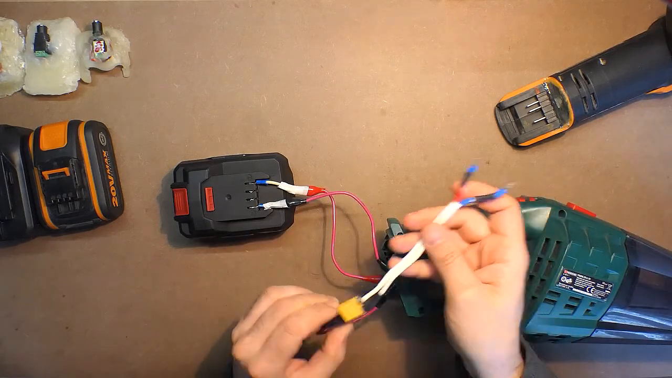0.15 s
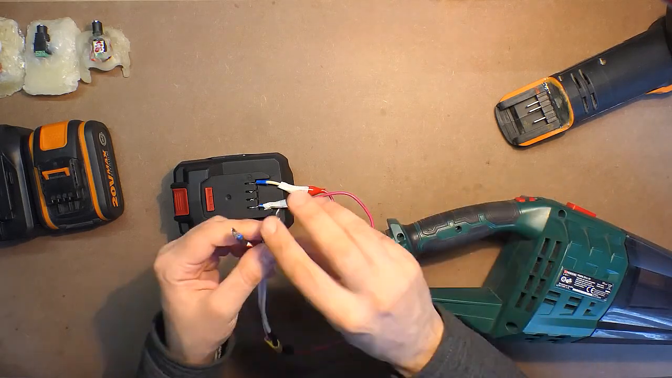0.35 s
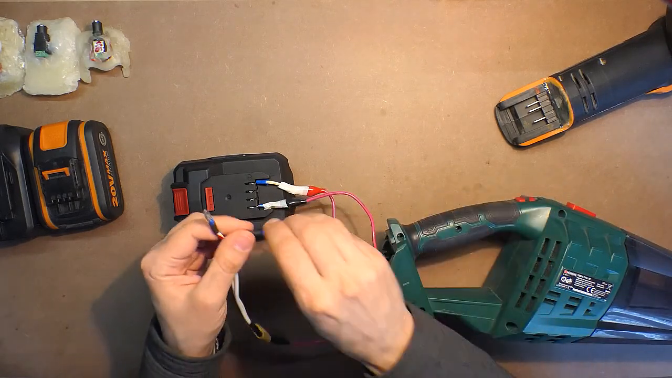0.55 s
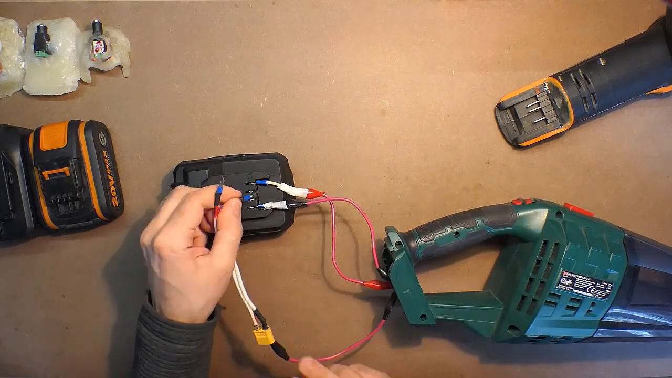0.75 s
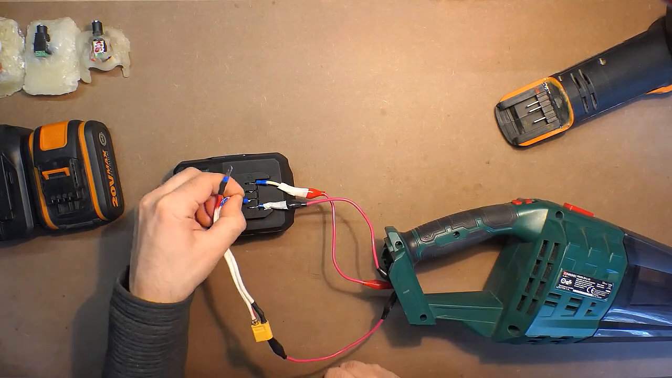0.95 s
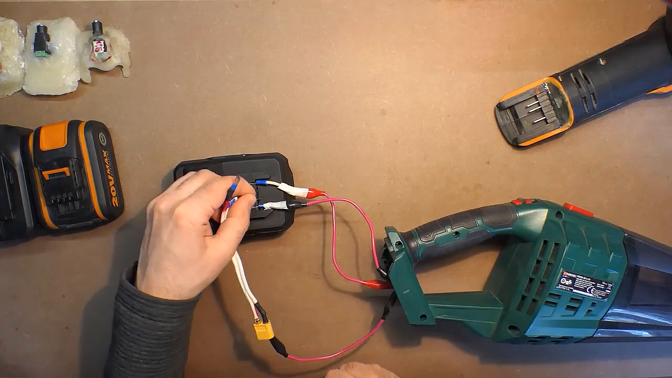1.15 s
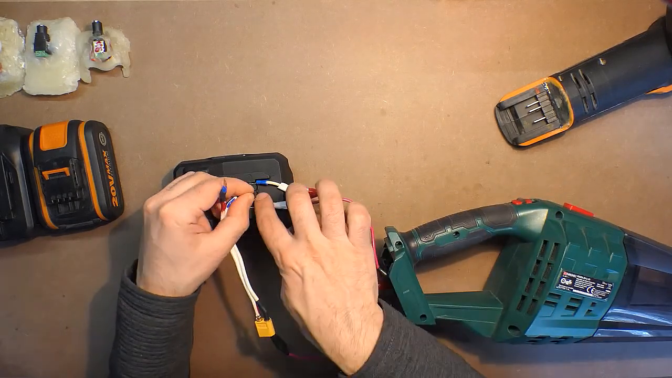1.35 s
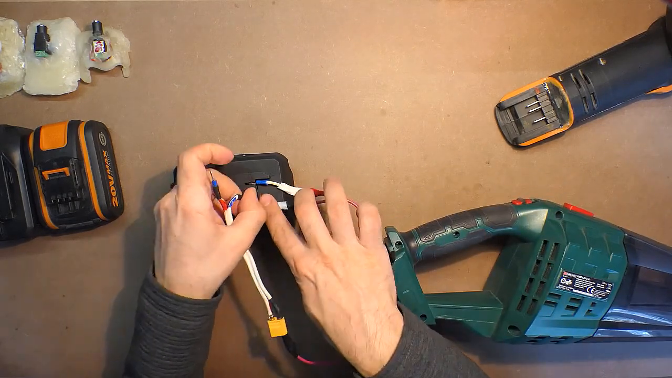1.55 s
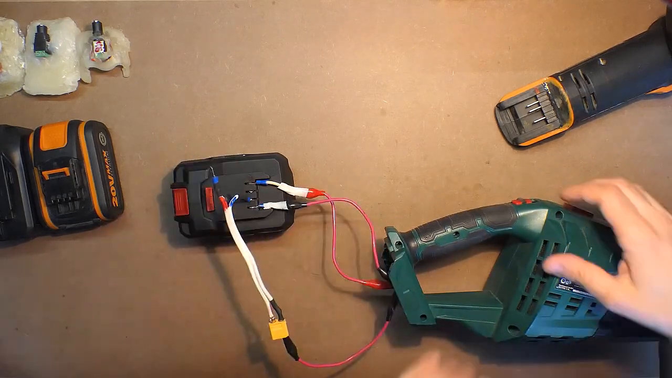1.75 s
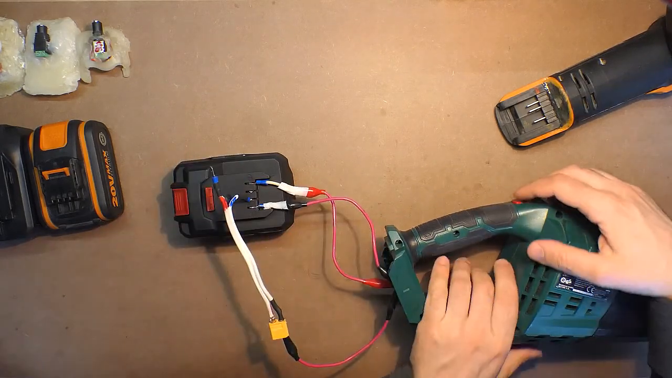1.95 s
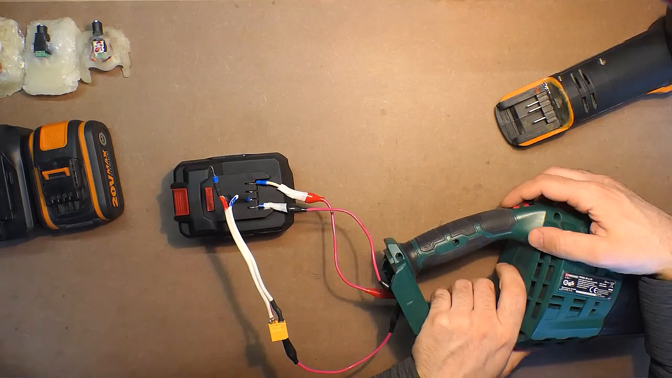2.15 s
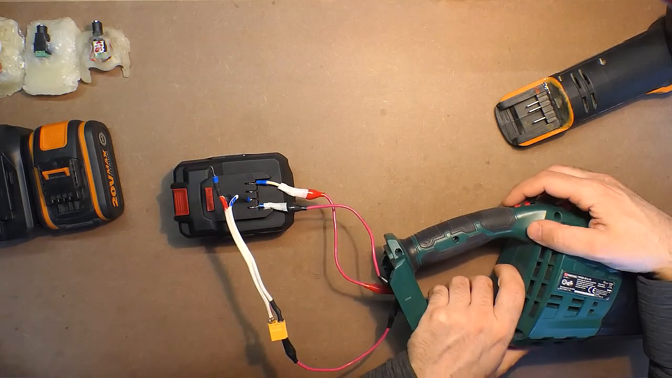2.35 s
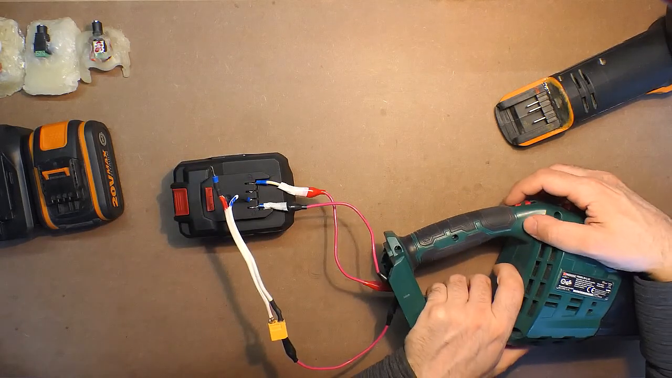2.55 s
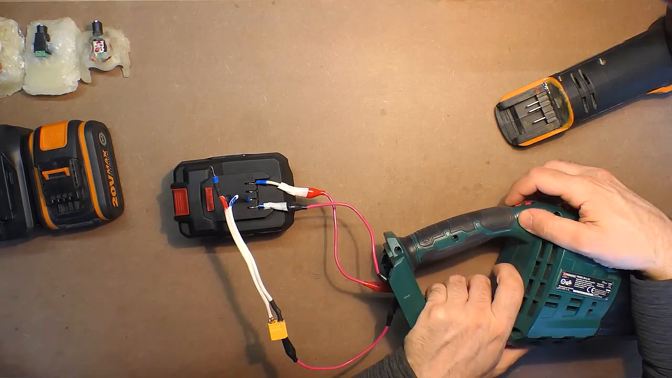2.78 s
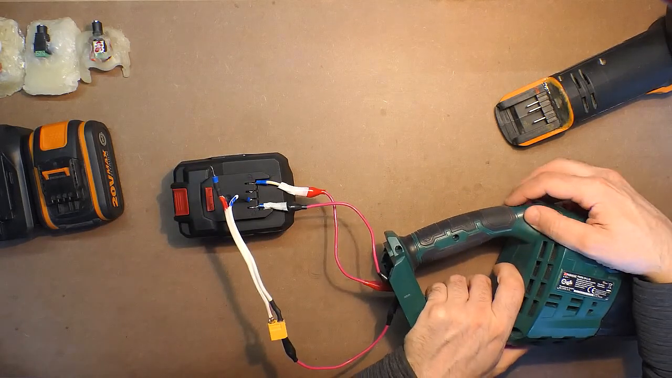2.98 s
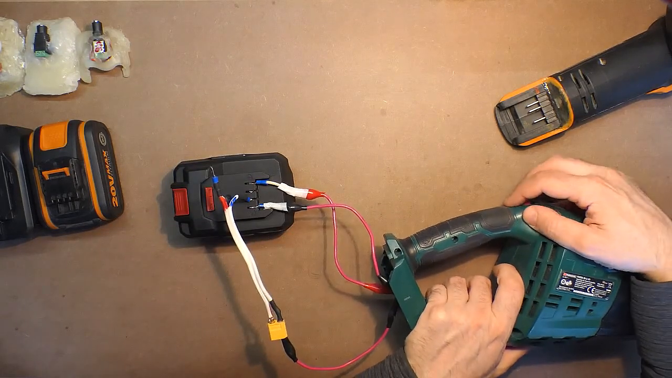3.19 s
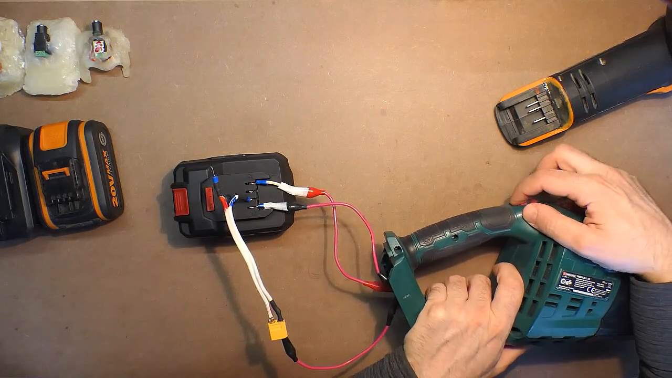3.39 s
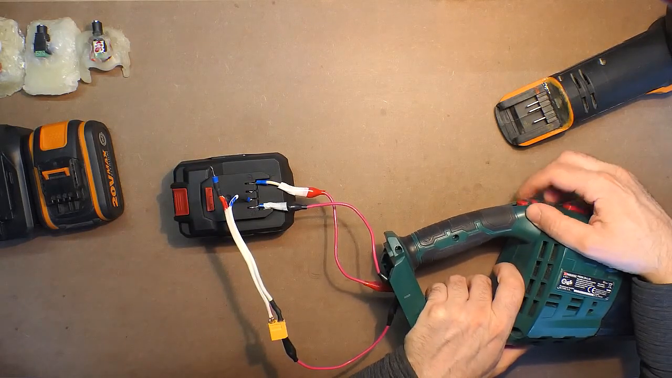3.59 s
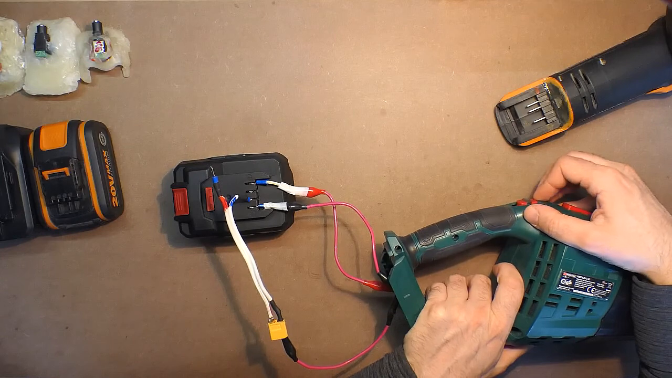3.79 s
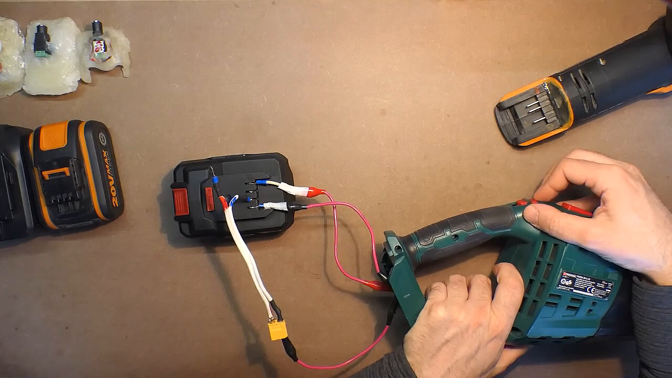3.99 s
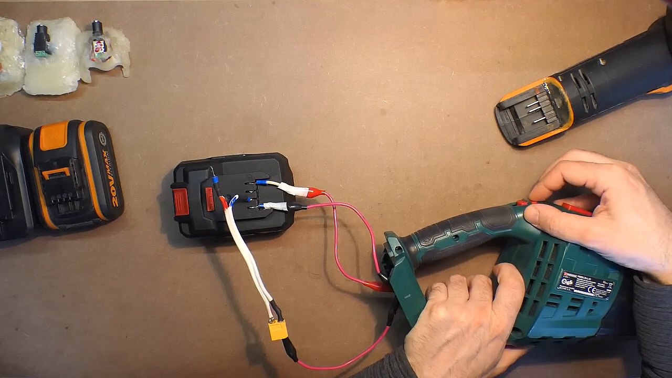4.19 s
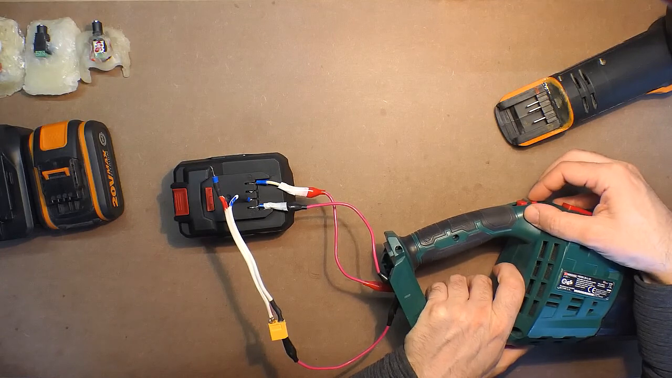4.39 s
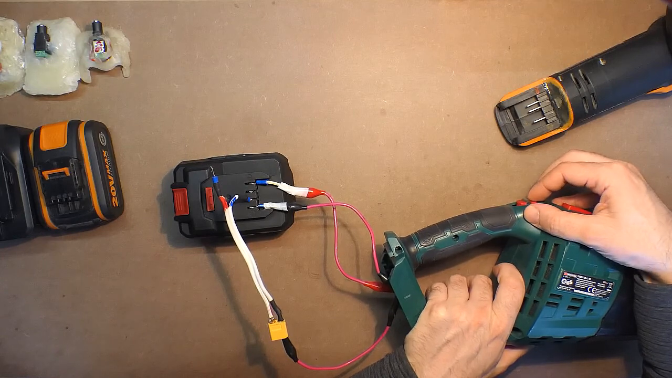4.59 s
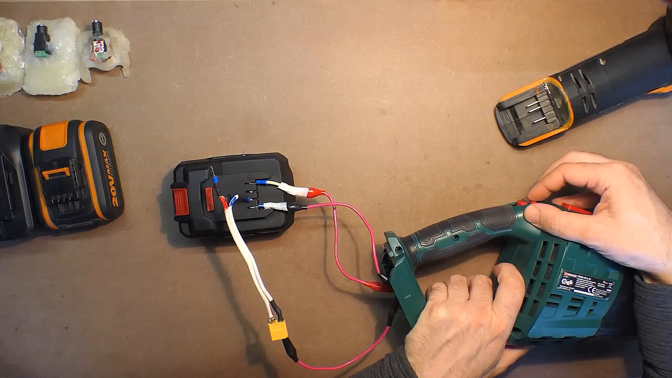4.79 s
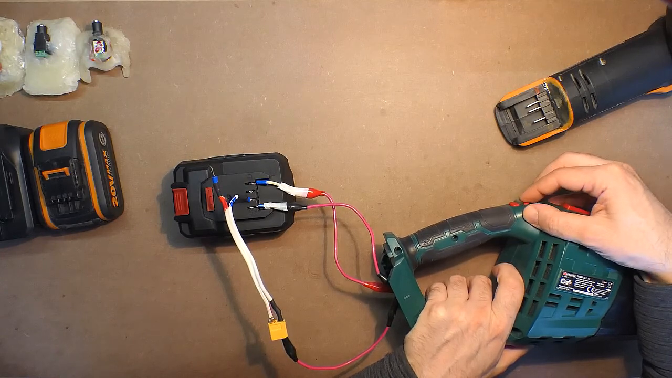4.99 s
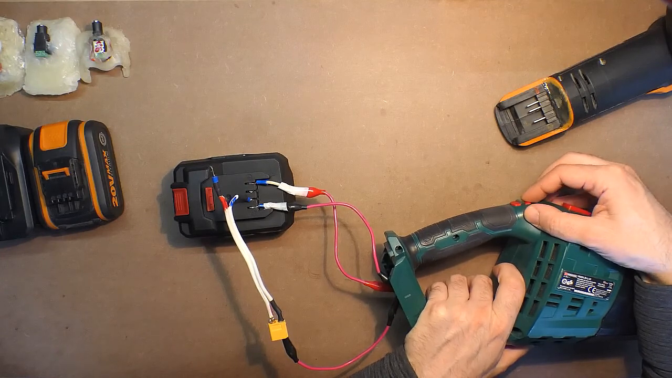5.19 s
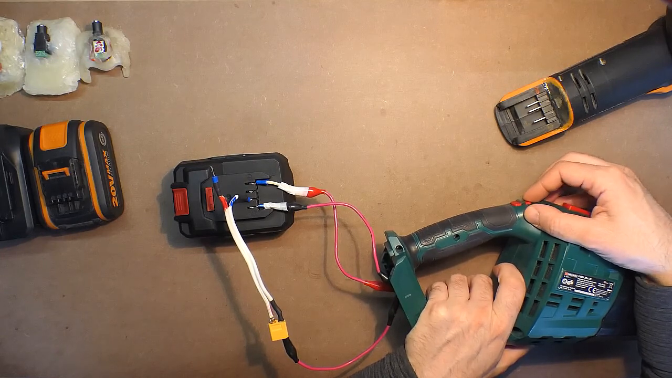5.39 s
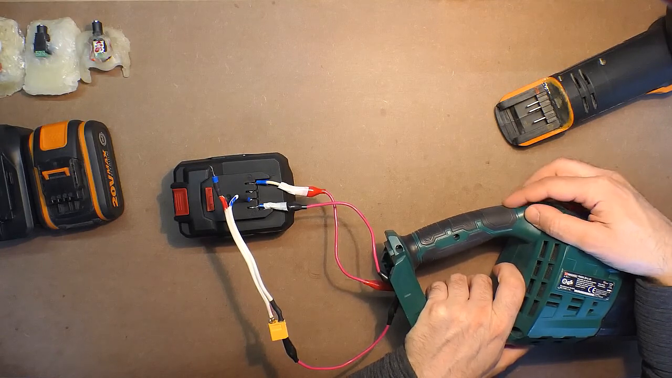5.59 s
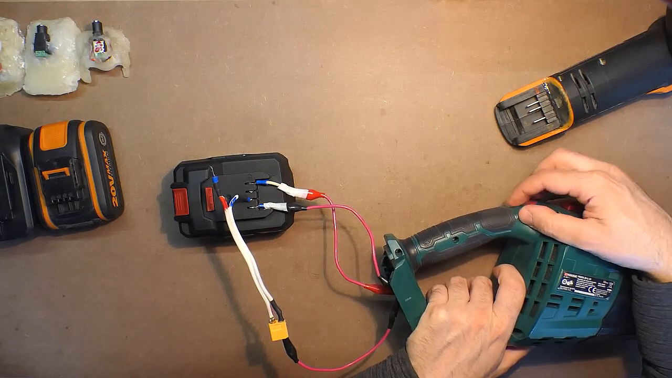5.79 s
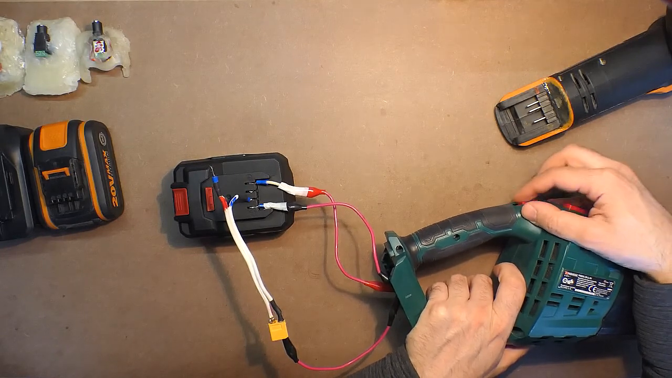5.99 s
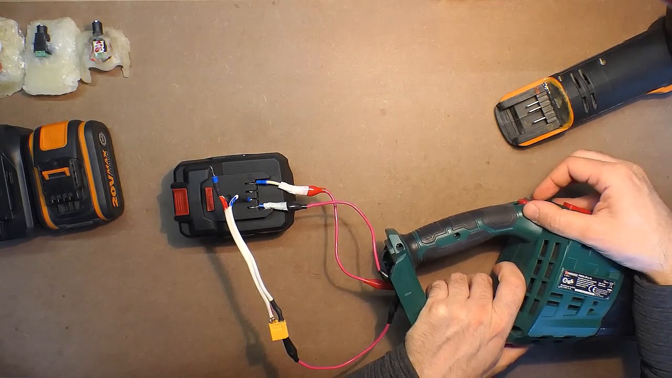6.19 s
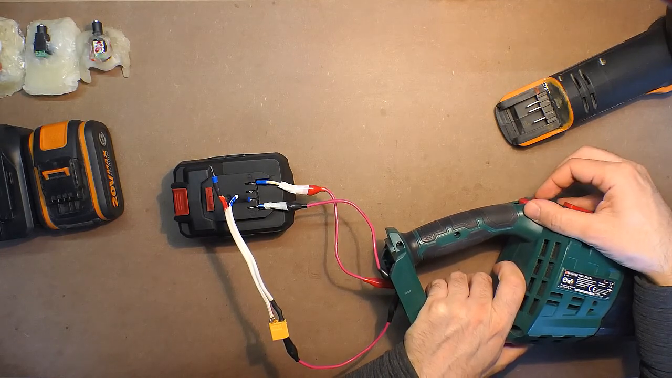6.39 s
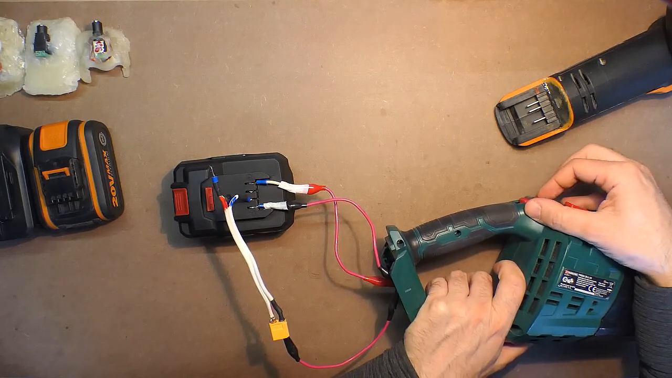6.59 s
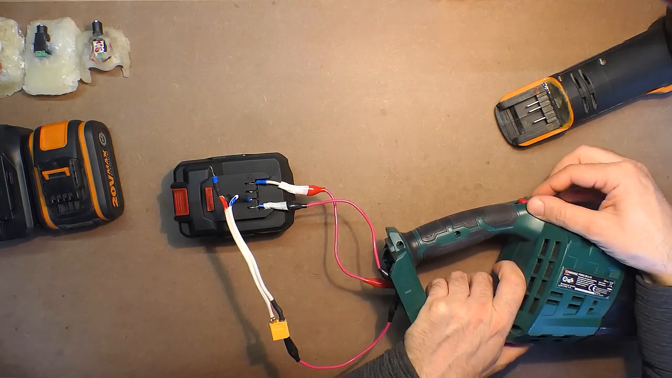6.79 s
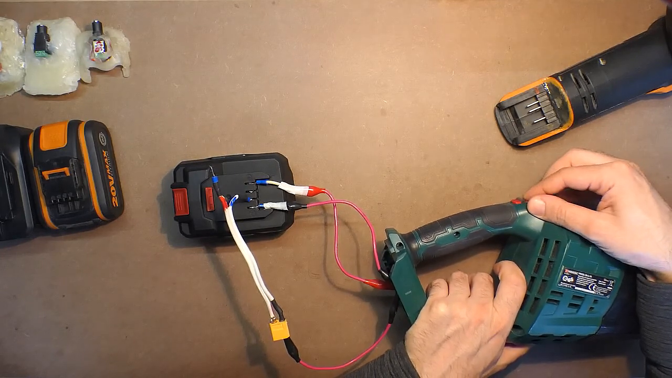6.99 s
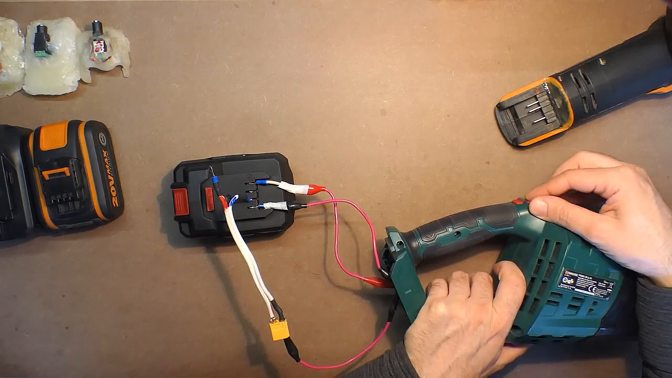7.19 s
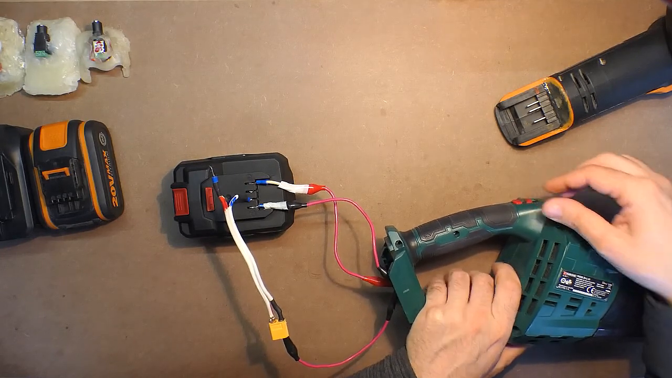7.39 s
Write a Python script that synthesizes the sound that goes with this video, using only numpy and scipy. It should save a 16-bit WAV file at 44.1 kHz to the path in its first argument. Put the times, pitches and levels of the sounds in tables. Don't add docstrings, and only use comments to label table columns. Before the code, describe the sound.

After quiet ticks, rustles and soft bench thumps, a small vacuum motor snaps on, whines with rushing air, winds down, then runs once more.

```python
import sys
import numpy as np
from scipy import signal
from scipy.fft import rfft, irfft, next_fast_len
from scipy.io import wavfile
from scipy.ndimage import uniform_filter1d

SR = 44100
rng = np.random.default_rng(int(sys.argv[2]) if len(sys.argv) > 2 else 0)


def log_audio(samples):
    frames = np.atleast_2d(samples).T
    limited = np.clip(frames, -1, 1)
    pcm = np.round(limited * 32767).astype(np.int16)
    wavfile.write(sys.argv[1], SR, pcm)


def convert_level_to_amplitude(level_db):
    exponent = np.asarray(level_db, float) / 20
    return 10 ** exponent


N = 328545


def rms_one(x):
    return x / np.sqrt(np.mean(x ** 2) + 1e-20)


def lift_db(modes, hz):
    return sum(db / (1 + (2 * (hz - centre_hz) / width_hz) ** 2) for centre_hz, width_hz, db in modes)


def coloured(spectrum, modes=()):
    size = next_fast_len(N)
    hz = np.arange(size // 2 + 1) * SR / size + 1e-3
    corner_hz, corner_db = np.transpose(spectrum)
    db = np.interp(np.log(hz), np.log(corner_hz), corner_db, left=-90, right=-90)
    white = rfft(rng.standard_normal(size))
    return rms_one(irfft(white * convert_level_to_amplitude(db + lift_db(modes, hz)), size)[:N])


def drift(rate_hz):
    r = np.exp(-80 * np.pi * rate_hz / SR)
    slow = signal.lfilter([1], [1, -2 * r, r * r], rng.standard_normal(N // 40 + 2002))[2000:]
    return np.interp(np.arange(N) / 40, np.arange(len(slow)), rms_one(slow))


def dying(start_s, t60_s, rise_s):
    i = int(start_s * SR)
    t = np.arange(min(int(t60_s * SR), N - i)) / SR
    return slice(i, i + len(t)), t, convert_level_to_amplitude(-60 * t / t60_s) * (1 - np.exp(-t / rise_s))


def band_passed(x, low_hz, high_hz):
    return signal.sosfilt(signal.butter(2, [low_hz, high_hz], "band", fs=SR, output="sos"), x)


# f/Hz, density/dB
HUSH_SPECTRUM = [(12, -28), (20, 8), (50, 0.5), (110, -0.5), (227, -17), (300, -17), (655, -46), (969, -27),
                 (1150, -34), (10100, -49), (15800, -53)]


def background_hush():
    return convert_level_to_amplitude(-63) * coloured(HUSH_SPECTRUM)


# t/s, rustle level/dB
HAND_ACTIVITY = [
    (0.0, -82),
    (1.79, -77.5),
    (1.84, -70.5),
    (1.95, -66.5),
    (2.2, -61),
    (2.25, -69.5),
    (2.45, -68),
    (2.74, -69.5),
    (2.79, -69),
    (3.27, -74.5),
]
# f/Hz, density/dB
RUSTLE_SPECTRUM = [(590, -21), (1000, -4), (1290, -7), (1530, -10), (2090, -4.5), (5000, -10.5),
                   (9500, -8.5), (15800, -12)]
# f/Hz, density/dB
KNOCKING_SPECTRUM = [(71, -39), (120, -7), (261, -11.5), (529, -14), (702, -21.5), (1560, -26), (2000, -38),
                     (2600, -72), (4400, -120)]
# f/Hz, density/dB
RUMBLE_SPECTRUM = [(11, -67), (18, -8.5), (49, -1), (66, -3), (91, -6), (150, -18), (200, -48), (330, -120)]


def hands():
    t = np.arange(N) / SR
    activity_s, activity_db = np.transpose(HAND_ACTIVITY)
    rustle_db = np.interp(t, activity_s, activity_db)
    swing_db = rustle_db - rustle_db.max()
    before = t < activity_s[-1]
    rustle = convert_level_to_amplitude(rustle_db + 1.4 * drift(21)) * coloured(RUSTLE_SPECTRUM)
    knocking = convert_level_to_amplitude(-60 + 0.9 * swing_db + 2.6 * drift(14)) * coloured(KNOCKING_SPECTRUM)
    motor_rumble_db = -53.5
    rumble_db = np.where(before, -48.5 + 0.77 * swing_db, motor_rumble_db)
    rumble = convert_level_to_amplitude(rumble_db + 2.6 * drift(2.5)) * coloured(RUMBLE_SPECTRUM)
    return before * (rustle + knocking) + rumble


# t/s, peak level/dB, body f/Hz, bright level/dB
LEAD_TICKS = [(0.0994, -61, 3300, 9), (0.3594, -72, 1170, 16), (0.838, -54, 1520, -14),
              (0.855, -47, 2530, -3), (0.909, -53, 1515, -5), (0.954, -35.5, 2380, -8.5),
              (0.9554, -42, 4270, -15), (0.9616, -44, 1770, -12), (1.1344, -62, 3420, -10),
              (1.149, -39.5, 3100, 6.5), (1.182, -33.5, 2760, -1.5), (1.2447, -48, 2770, 4),
              (1.324, -57.5, 2820, 15), (1.4194, -61, 3210, -9), (1.5505, -50, 2920, -3),
              (1.565, -45, 2530, 2), (1.6214, -57.5, 2470, 10)]
# t/s, peak level/dB, body f/Hz, bright level/dB, knock level/dB
GRIP_TICKS = [(0.029, -66, 900, -12, 15), (2.068, -48, 1240, -12, -3), (2.1564, -53.5, 1640, -12, 14),
              (2.2404, -54, 1360, 10, -2), (2.323, -37, 2070, -11, -10), (2.4424, -51, 1140, -12, 23.5),
              (2.591, -42.5, 2420, 3, -0.5), (2.609, -45.5, 1340, 5, -1), (2.8318, -42, 1500, 0.5, 1.5),
              (2.9685, -37.5, 2600, -5, -27), (3.0594, -55, 1870, -6, 6.5)]


def ticks():
    lead_knock_db, lead_t60_s, grip_t60_s = -15, 0.034, 0.027
    out, white = np.zeros(N), rng.standard_normal(N)
    grains = rms_one(convert_level_to_amplitude(5.2 * drift(270)))
    bright = band_passed(white, 4500, 11500)
    knock = rms_one(band_passed(rng.standard_normal(N), 130, 600))
    rows = [(*row, lead_knock_db, lead_t60_s) for row in LEAD_TICKS]
    rows += [(*row, grip_t60_s) for row in GRIP_TICKS]
    for start_s, peak_db, body_hz, bright_db, knock_db, t60_s in rows:
        i = round(start_s * SR)
        at, t = slice(i - 900, i + 3000), np.arange(-900, 3000) / SR
        crack = (t >= 0) * convert_level_to_amplitude(-60 * np.abs(t) / (0.7 * t60_s))
        cluster = 0.19 * grains[at] * np.exp(-((t - 0.064 * t60_s) / (0.54 * t60_s)) ** 2)
        body = rms_one(band_passed(white[at], body_hz * 0.68, body_hz * 1.75))
        out[at] += convert_level_to_amplitude(peak_db - 9.5) * (crack + cluster) * (body + convert_level_to_amplitude(bright_db) * bright[at])
        at, t, fall = dying(start_s, 3.1 * t60_s, 0.0064)
        out[at] += convert_level_to_amplitude(peak_db + knock_db - 6) * fall * knock[at]
    return out


# t/s, peak level/dB, f/Hz, t60/s, rise/s
BENCH_THUMPS = [(.03, -43, 68.7, .3, 0.016), (0.94, -46, 78.5, 0.18, 0.011), (1.15, -40.5, 55, 0.4, 0.012),
                (1.171, -50, 144, 0.097, 0.0072), (1.554, -29, 60.5, 0.089, .03),
                (1.562, -41, 170, 0.022, 0.0058), (.95, -53, 218, 0.081, .005),
                (2.12, -39.5, 53, 0.7, 0.051), (2.443, -30, 51.3, 0.43, 0.0097),
                (2.443, -37.5, 140, 0.12, 0.0045), (2.614, -37, 44, 0.56, 0.0099),
                (2.821, -60.5, 57.5, 0.69, .01), (3.05, -48, 59.3, 0.91, 0.013),
                (3.278, -29.5, 116, 0.032, 0.0035), (3.278, -33, 45.6, 0.089, 0.0055),
                (3.40, -32, 62, 0.25, 0.0082), (3.948, -40, 53.7, 0.33, .02), (4.91, -29, 45, 0.35, 0.018),
                (5.79, -41, 50, .3, .03), (5.853, -33, 59, 0.16, 0.0084), (5.91, -30.5, 48.4, 0.26, 0.017),
                (6.979, -28.5, 52, 0.42, 0.018), (7.402, -34.5, 65, .3, .015)]


def thumps():
    out = np.zeros(N)
    for start_s, peak_db, hz, t60_s, rise_s in BENCH_THUMPS:
        at, t, fall = dying(start_s, t60_s, rise_s)
        out[at] += convert_level_to_amplitude(peak_db) * fall / fall.max() * np.sin(2 * np.pi * hz * t)
    return out


# t/s, peak level/dB, t60/s
SWITCH_CONTACTS = [(3.261, -52, 0.048), (3.2779, -16.5, 0.036), (3.2802, -6.5, 0.03), (3.281, 2, 0.025),
                   (3.288, -9, 0.032), (3.293, -43, .1), (3.387, -31, 0.23), (4.899, -9.5, 0.033),
                   (4.906, -21, .05), (5.844, -19, .03), (5.8469, 3, 0.022), (5.849, -3.5, 0.02),
                   (5.853, -12, 0.032), (5.861, -35, .06), (6.973, -9.5, 0.1)]
# f/Hz, density/dB
SWITCH_SPECTRUM = [(120, -14), (200, -11), (968, -14.5), (2380, -4), (3070, -0.5), (3490, -3.5),
                   (5330, -2.5), (7410, -4.5), (8120, 1), (10100, -1.5), (11900, -6), (15100, -13.5),
                   (16000, -26)]


def switch():
    out, crack = np.zeros(N), coloured(SWITCH_SPECTRUM)
    for start_s, peak_db, t60_s in SWITCH_CONTACTS:
        at, t, fall = dying(start_s, t60_s, 0.00004)
        out[at] += convert_level_to_amplitude(peak_db - 5) * fall * crack[at]
    return out


TOP_SPEED_HZ = 396.9
# on t/s, off t/s
POWER = [
    (3.3813, 4.9048),
    (5.849, 6.9763),
]


def shaft():
    spin_up_s, settle_hz, settle_s = 0.0914, 16.5, 0.45
    coast_s, coast_power = 2.12, 2.04
    warm_gain_hz = 1.0
    t, speed, rest, top = np.arange(N) / SR, np.zeros(N), 0, TOP_SPEED_HZ
    ends = [on for on, off in POWER[1:]] + [N / SR]
    for (on, off), end in zip(POWER, ends):
        driven = np.clip(t, on, off) - on
        free = np.clip(t, off, end) - off
        quick = (top - rest - settle_hz) * np.exp(-driven / spin_up_s)
        creep = settle_hz * np.exp(-driven / settle_s)
        coast = (1 + free / coast_s) ** -coast_power
        speed = np.where(t >= on, (top - quick - creep) * coast, speed)
        rest, top = speed[-1], top + warm_gain_hz
    return speed


# multiple, powered level/dB, coasting level/dB, inrush level/dB, roughness 0-1
SHAFT_ORDERS = [(1, -45, -45, -40, .35), (2, -49, -42, -45, .8), (3, -36, -42, -46, .12),
                (14, -41, -52, -55, .5), (10, -42, -33, -11, .25), (4, -48, -43, -50, .6),
                (5, -36, -45, -26, .5), (6, -48, -44, -55, .6), (7, -35, -35, -40, .4),
                (8, -44, -48, -50, .9), (9, -50, -49, -55, .9), (15, -58, -57, -13, .6),
                (35, -50, -66, -70, .55)]
# f/Hz, width/Hz, lift/dB
FRAME_MODES = [(359, 125, 18.5), (403.2, 29, -11), (598, 31, 10.5), (764, 87, 9.5), (1025, 183, -13),
               (1127, 320, 10), (1680, 204, -14), (1916, 71, 6), (2150, 76, 3.5), (2676, 280, 6.5),
               (3000, 83, 5), (3780, 800, -11), (4670, 240, 20), (5307, 360, 9.5)]


def shaft_orders(speed, powered):
    poles, breakaway_hz = 5, 108
    whine_slope_db, cogging_slope_db, load_slope_db = 26, 28.5, 18
    inrush_delay = 0.44
    coasting_roughness = 0.45
    t = np.arange(N) / SR
    decades = np.log10(np.maximum(speed / TOP_SPEED_HZ, 0.05))
    inrush = powered * np.clip(1 - speed / TOP_SPEED_HZ, 0, 1) ** 1.97
    inrush = inrush * np.minimum(speed / breakaway_hz, 1) ** 4
    turn = 2 * np.pi * np.cumsum(speed * (1 + 0.000838 * drift(25))) / SR
    grip_db = -18.5 * np.exp(-((t - 6.86) / 0.09) ** 2)
    tones = 0
    for k, on_db, coast_db, inrush_db, roughness in SHAFT_ORDERS:
        coast_slope_db = whine_slope_db if k % poles else cogging_slope_db
        share = powered * convert_level_to_amplitude(on_db + (whine_slope_db + load_slope_db) * decades)
        share = share + (1 - powered) * convert_level_to_amplitude(coast_db + coast_slope_db * decades)
        share = share + inrush * convert_level_to_amplitude(inrush_db + 20 * inrush_delay * max(k - poles, 0) * decades)
        lift = lift_db(FRAME_MODES, k * speed[::64]).repeat(64)[:N]
        if k == 3:
            lift = lift + grip_db
        rough = roughness * (coasting_roughness + (1 - coasting_roughness) * powered)
        waver = np.sqrt(1 - rough ** 2) + rough * drift(19.5)
        tone = np.sin(k * turn + rng.uniform(0, 2 * np.pi))
        tones = tones + share * convert_level_to_amplitude(lift + 2.2 * drift(2.1)) * waver * tone
    return np.sqrt(2) * tones


# f/Hz, density/dB
ROAR_SPECTRUM = [(590, -79), (1000, -9), (1160, -2.5), (1260, -4.5), (1490, -7.5), (1930, -1), (2510, -5.5),
                 (2850, -4), (4350, -9.5), (5500, -14.5), (7150, -76), (12100, -120)]
# f/Hz, density/dB
HISS_SPECTRUM = [(2650, 0), (4500, -2), (4740, -14), (5050, 0.5), (5730, -3.5), (6430, -7.5), (6570, -3),
                 (6960, -1), (7610, -3.5), (9850, 1), (10700, -6.5), (11500, -3.5), (15800, -14.5)]
# f/Hz, density/dB
SHUDDER_SPECTRUM = [(53, -39), (90, -16), (290, -6), (333, -7), (396, -4), (682, -9.5), (1000, -11),
                    (1300, -27), (2200, -120)]
# f/Hz, width/Hz, lift/dB
HOUSING_MODES = [(328, 10.5, -4.5), (478, 15, 7), (582, 35, 4.5), (746, 50, 3), (6020, 70, 7),
                 (2100, 72, -3), (2130, 380, 5), (2954, 37, 7), (3067, 147, 8), (3440, 450, 5),
                 (3870, 100, 6), (4665, 127, 16), (4780, 130, 2.5), (4880, 110, 4.5), (5810, 60, 8),
                 (6440, 120, 4), (8850, 73, -7), (9870, 880, 2), (11100, 160, 7), (13920, 150, -12)]


def fan_air(speed):
    t = np.arange(N) / SR
    decades = np.log10(np.maximum(speed / TOP_SPEED_HZ, 0.05))
    roar_db = -22.5 + 33 * decades
    hiss_db = -22.5 + 61.2 * decades
    shudder_db = -29.5 + 30.6 * decades
    jolt = convert_level_to_amplitude(-32 + 5.3 * drift(160)) * np.exp(-((t - 3.405) / 0.025) ** 2)
    roar = (jolt + convert_level_to_amplitude(roar_db - 3.5 + 1.05 * drift(12))) * coloured(ROAR_SPECTRUM, HOUSING_MODES)
    hiss = convert_level_to_amplitude(hiss_db + 1.1 * drift(2.9)) * coloured(HISS_SPECTRUM, HOUSING_MODES)
    shudder = 0.5 * jolt + convert_level_to_amplitude(shudder_db - 1 + 1.75 * drift(16))
    return roar + hiss + shudder * coloured(SHUDDER_SPECTRUM, HOUSING_MODES)


def motor():
    speed, t = shaft(), np.arange(N) / SR
    powered = uniform_filter1d(sum(1.0 * (t > on) * (t < off) for on, off in POWER), size=1500)
    start = np.clip((t - POWER[0][0]) / 0.0031, 0, 1)
    return shaft_orders(speed, powered) * start, fan_air(speed) * start


def room(x):
    t60_s, level_db = 0.23, -7
    t = np.arange(int(0.4 * SR)) / SR
    tail = signal.lfilter([1], [1, -0.3], rng.standard_normal(len(t)))
    tail = tail * convert_level_to_amplitude(-60 * t / t60_s) * (t > 0.002)
    return convert_level_to_amplitude(level_db) * signal.fftconvolve(x, tail / np.sqrt(np.sum(tail ** 2)))[:N]


def scene():
    snaps, small, (tones, air) = switch(), ticks(), motor()
    walls = room(snaps + 0.25 * small + 0.7 * air + 0.25 * tones)
    mono = background_hush() + hands() + small + thumps() + snaps + tones + air + walls
    return np.array([mono, mono])


def top_cut(x):
    return signal.sosfilt(signal.butter(12, 15850, fs=SR, output="sos"), x)


def record(dry):
    return top_cut(0.98 * np.tanh(dry / 0.95))


dry = scene()
out = record(dry)
log_audio(out)
```